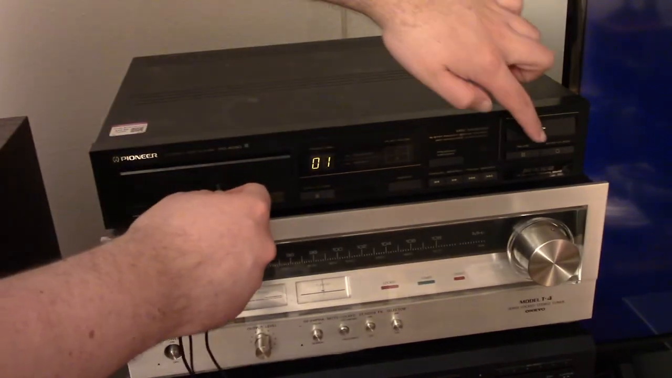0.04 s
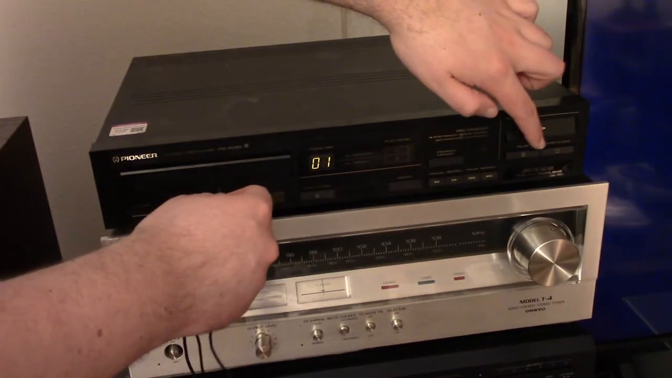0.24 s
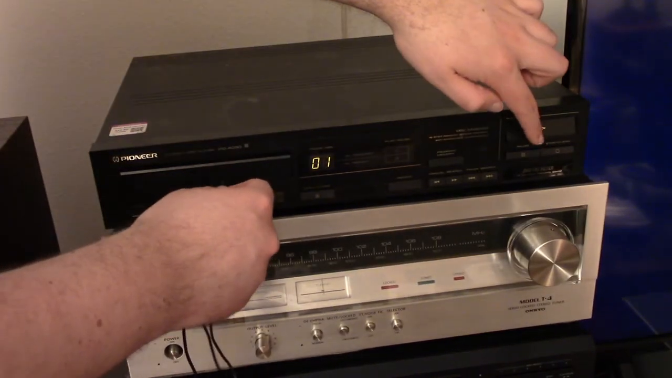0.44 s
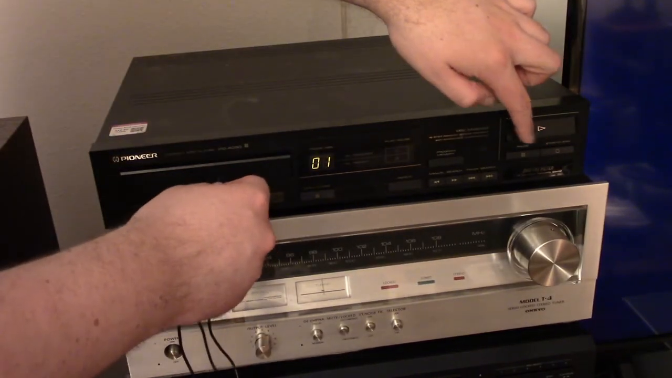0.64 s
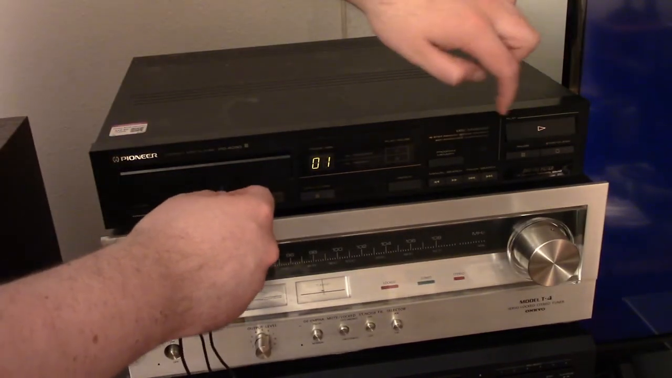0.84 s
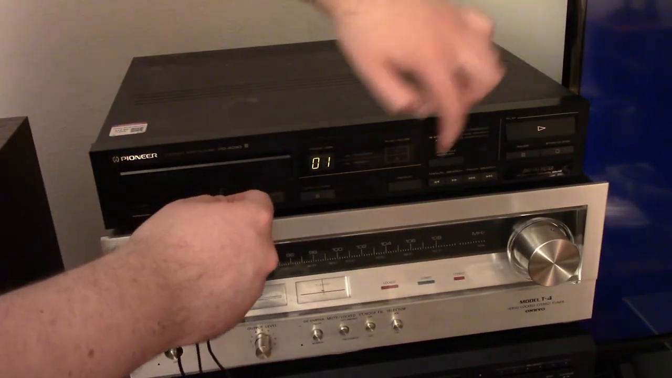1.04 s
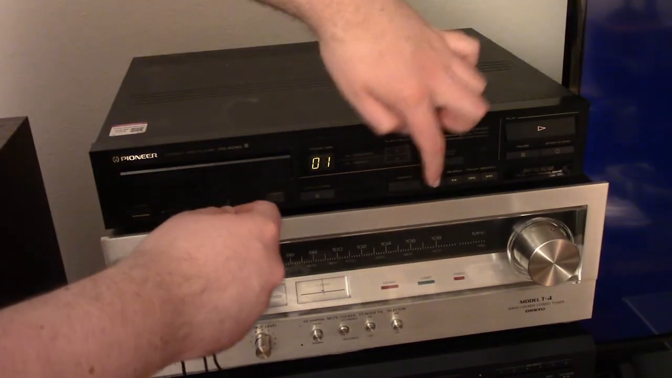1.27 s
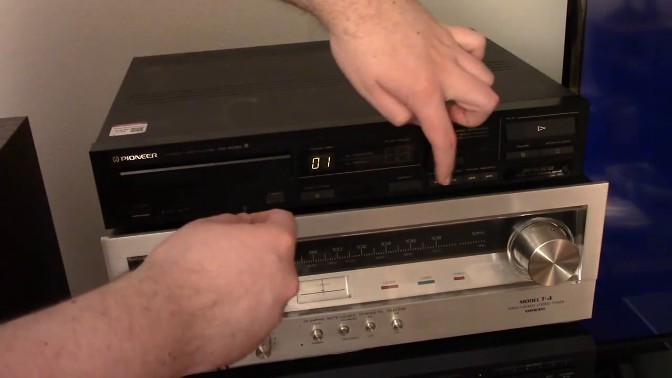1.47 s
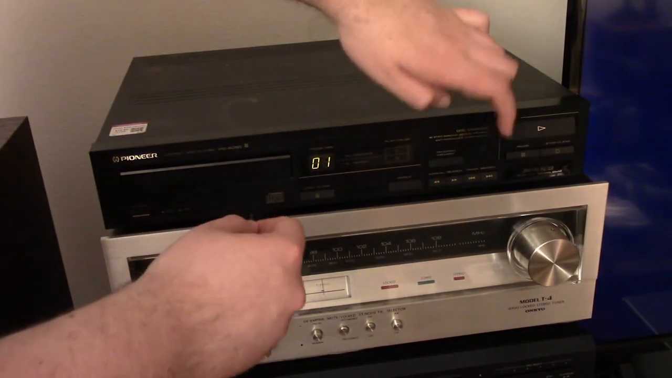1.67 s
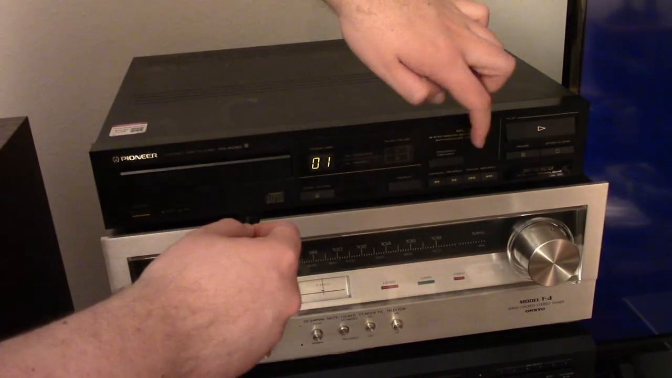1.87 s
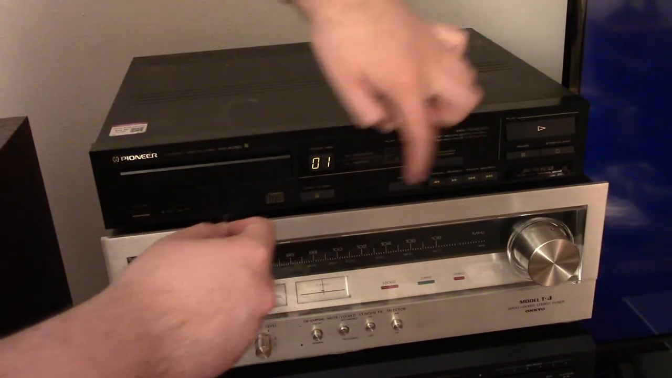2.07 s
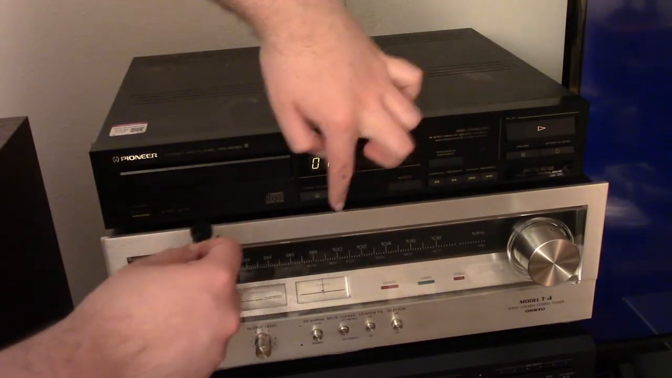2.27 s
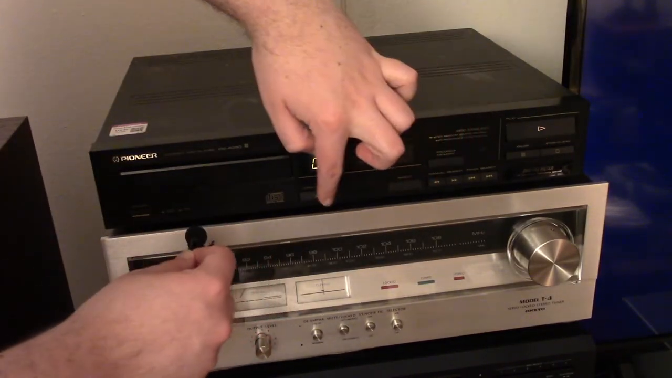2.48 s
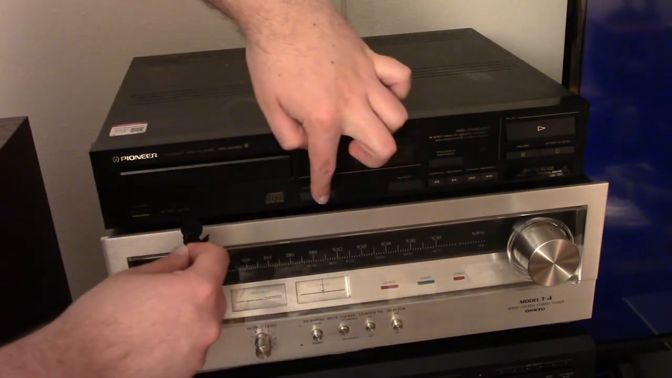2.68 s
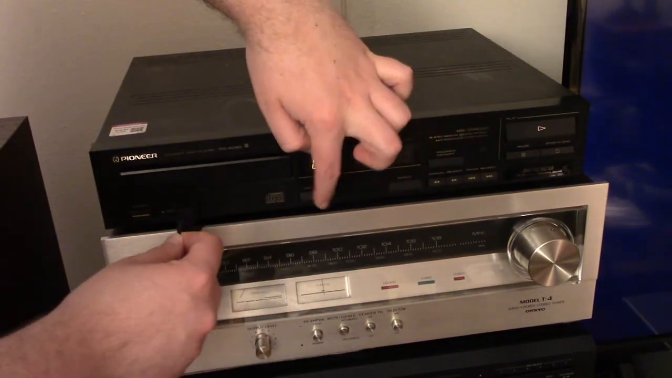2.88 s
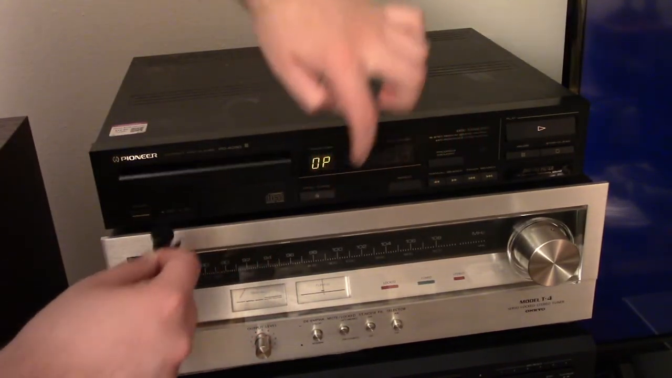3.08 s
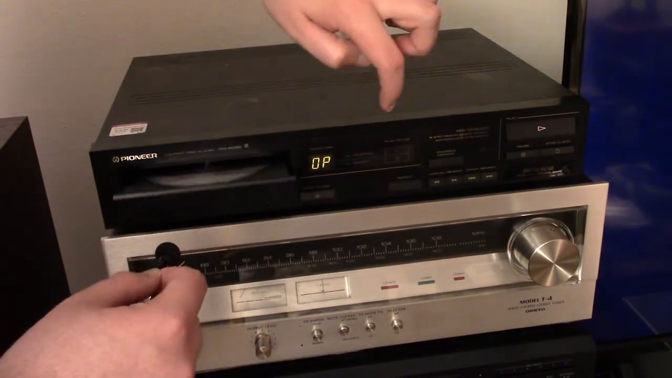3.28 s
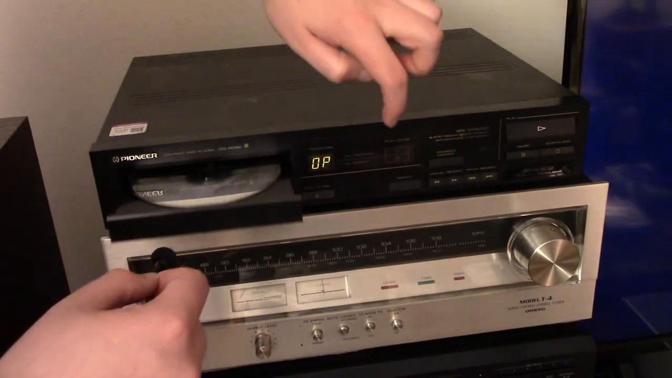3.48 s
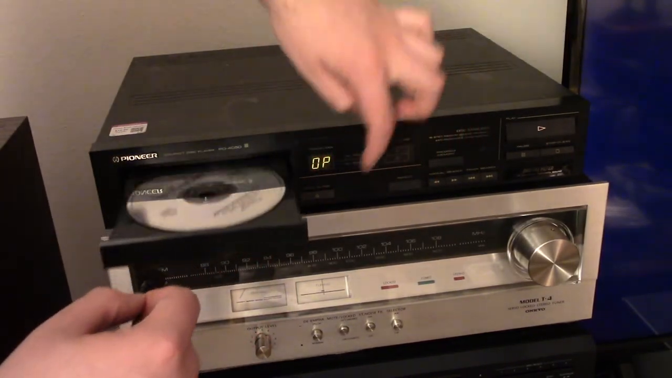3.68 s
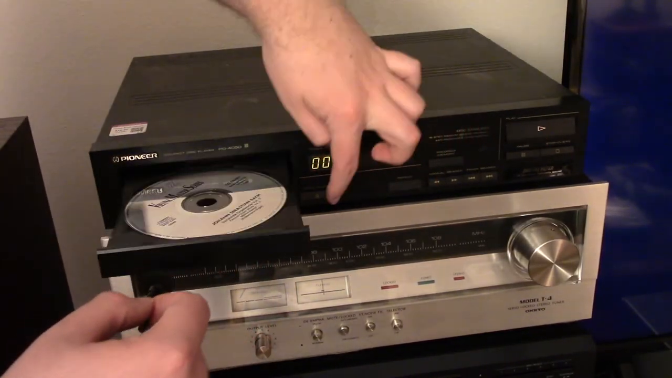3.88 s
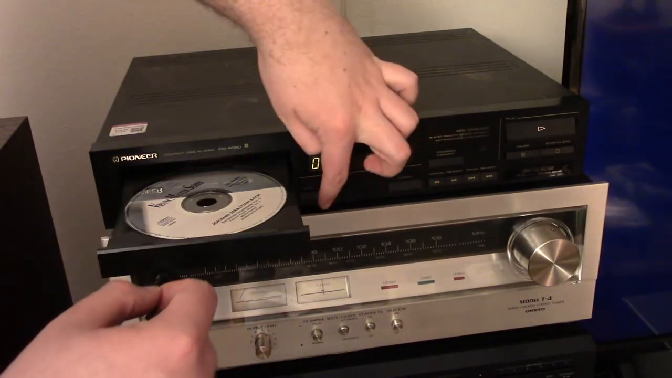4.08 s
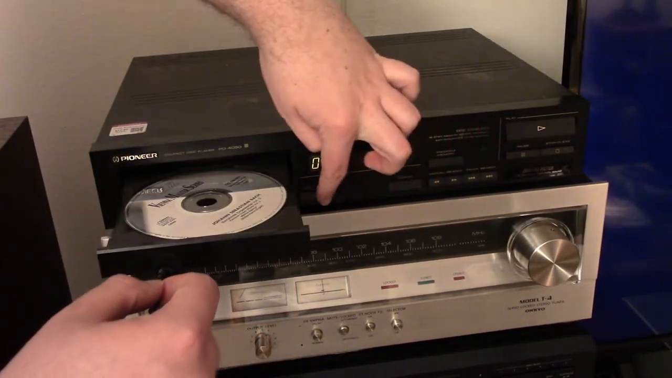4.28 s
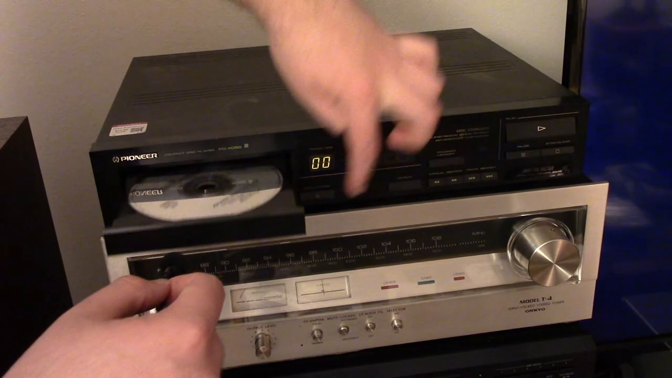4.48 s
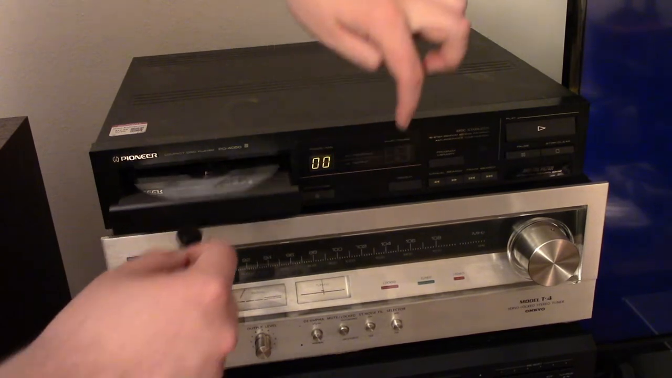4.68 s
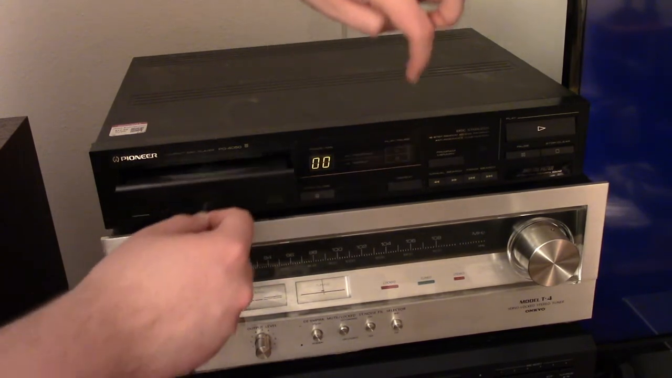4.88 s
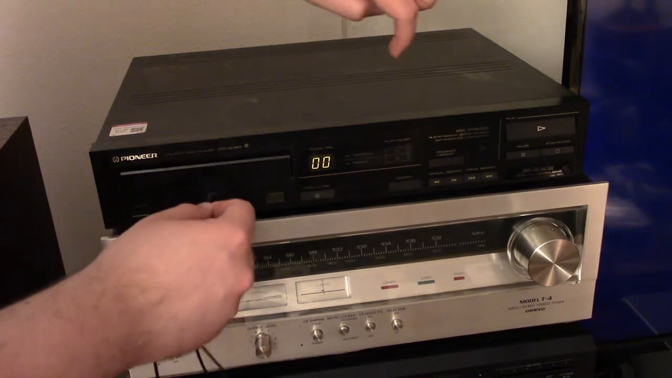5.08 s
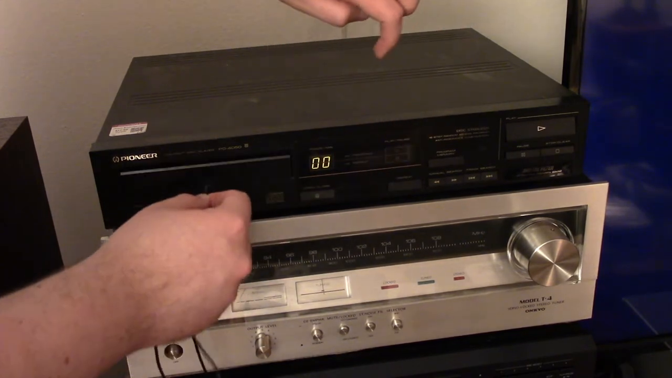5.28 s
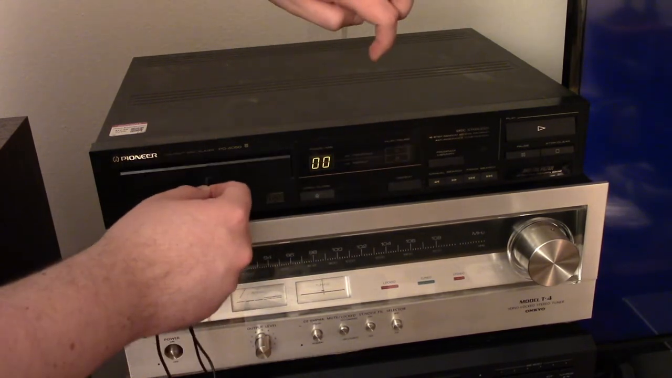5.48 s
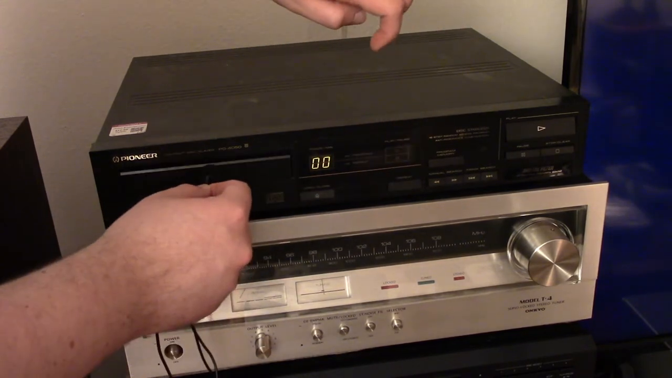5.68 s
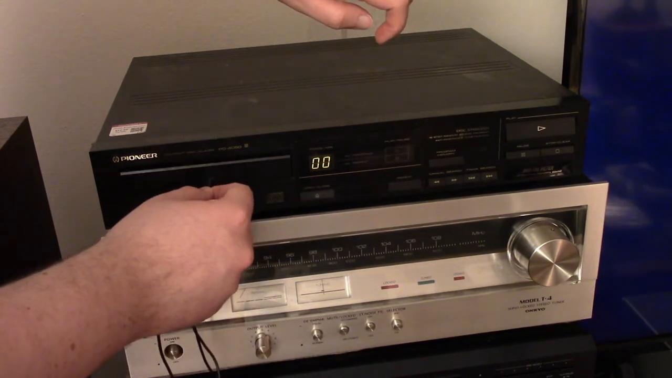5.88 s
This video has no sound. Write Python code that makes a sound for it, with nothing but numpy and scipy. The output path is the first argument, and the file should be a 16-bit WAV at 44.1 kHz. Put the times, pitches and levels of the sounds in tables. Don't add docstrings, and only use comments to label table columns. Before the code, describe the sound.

One close microphone in a small quiet room with soft rumble and hiss. Fingertips brush the panel while the disc whirrs to a stop. Light taps lead to clicks and knocks as the clamp releases, a raspy motorized tray opens and clacks at its end. It pauses, runs back in, slams loudest of all, rattles briefly, and the case and shelf ring away.

```python
import sys
import numpy as np
from scipy import signal
from scipy.fft import rfft, irfft, next_fast_len
from scipy.io import wavfile

SR = 44100
rng = np.random.default_rng(int(sys.argv[2]) if len(sys.argv) > 2 else 0)


def unload_audio(sound):
    columns = np.transpose(np.atleast_2d(sound))
    steps = np.round(np.clip(columns, -1, 1) * 32767)
    wavfile.write(sys.argv[1], SR, steps.astype(np.int16))


def gain_from_db(level_db):
    decades = np.asarray(level_db, float) / 20
    return 10 ** decades


N = 261733


def rms_one(x):
    return x / np.sqrt(np.mean(x ** 2) + 1e-20)


def in_time(rows, outside=None):
    s, *columns = np.transpose(rows)
    return [np.interp(np.arange(N) / SR, s, c, outside, outside) for c in columns]


def band(x, low_hz, high_hz):
    return signal.sosfilt(signal.butter(2, [low_hz, min(high_hz, .45 * SR)], "band", fs=SR, output="sos"), x)


def low_pass(x, hz):
    return signal.sosfilt(signal.butter(4, min(hz, .45 * SR), fs=SR, output="sos"), x)


def resonate(x, hz, width_hz):
    r = np.exp(-np.pi * width_hz / SR)
    edge = (1 - r * r) / 2
    return signal.lfilter([edge, 0, -edge], [1, -2 * r * np.cos(2 * np.pi * hz / SR), r * r], x)


def body(x, peaks):
    return sum((-1) ** k * gain_from_db(db) * resonate(x, hz, width) for k, (hz, width, db) in enumerate(peaks))


def wavering(x, peaks, swing_db, rate):
    out = np.zeros(N)
    for k, (hz, width, db) in enumerate(peaks):
        out += (-1) ** k * gain_from_db(db + swing_db * drift(rate)) * resonate(x, hz, width)
    return out


def gliding(x, peaks, ratio, swing_db, wander):
    out = np.zeros(N)
    for hz, width, db in peaks:
        turn = np.exp(2j * np.pi * np.cumsum(hz * (ratio + wander * drift(9))) / SR)
        r = np.exp(-np.pi * width / SR)
        ring = 2 * np.real(turn * signal.lfilter([1 - r], [1, -r], x / turn))
        out += gain_from_db(db + swing_db * drift(8.9)) * ring
    return out


def drift(rate):
    r = np.exp(-80 * np.pi * rate / SR)
    slow = signal.lfilter([1], [1, -2 * r, r * r], rng.standard_normal(N // 40 + 2002))[2000:]
    return np.interp(np.arange(N) / 40, np.arange(len(slow)), rms_one(slow))


def coloured(spectrum):
    hz, db = np.transpose(spectrum)
    size = next_fast_len(N)
    shape = gain_from_db(np.interp(np.log(np.fft.rfftfreq(size, 1 / SR) + 1), np.log(hz), db))
    return rms_one(irfft(rfft(rng.standard_normal(size)) * shape, size)[:N])


def grit(per_s, spread_db, smooth):
    sizes = gain_from_db(spread_db * np.minimum(rng.exponential(1, N), 4)) * rng.choice([-1, 1], N)
    impacts = sizes * (rng.random(N) < per_s / SR)
    return rms_one(impacts) + smooth * rng.standard_normal(N)


def rattle(noise, length_s):
    return noise * np.exp(-np.arange(len(noise)) / SR / max(length_s, .0003))


def add(out, s, sound, db):
    i = round(s * SR)
    out[i:i + len(sound)] += (gain_from_db(db) * sound / np.max(np.abs(sound)))[:N - i]


def strokes(rows, peaks):
    swell, t = np.zeros(N), np.arange(N) / SR
    for s, length, db in rows:
        swell += gain_from_db(db) * np.sin(np.pi * np.clip((t - s) / length, 0, 1)) ** 0.93
    rub = body(grit(per_s=4600, spread_db=13.5, smooth=2.6), peaks)
    return swell * gain_from_db(0.9 * drift(60)) * rms_one(rub)


# time_s, gear_load_db, sliding_db
DRIVE = [
    [(2.63, -73, -82), (2.69, -76, -77), (2.716, -40.5, -59), (2.886, -36, -58), (3.09, -47, -59),
     (3.22, -49, -63.5), (3.6, -46, -60), (3.72, -47, -64), (3.83, -76, -74)],
    [(4.2, -69, -80), (4.27, -44, -94), (4.372, -46, -61.5), (4.78, -42, -61), (4.93, -43.5, -57),
     (5.09, -43.5, -57.5), (5.128, -35.5, -61.5), (5.245, -34, -69), (5.34, -76, -100)],
]
# pitch_hz, width_hz, level_db
CASE = [(140, 11.6, -0.5), (187.4, 13, -3.5), (237, 13.5, 2), (282.3, 13.8, 1.5), (375, 67, -7.5),
        (556.6, 23, -4.5), (628, 47, -5.5), (815.6, 24.4, -4.5), (899, 63, -14.5), (1170, 89, -20.5)]
# pitch_hz, width_hz, level_db
TRAY = [(1250, 91, 10.1), (1670, 780, 0.17), (2450, 680, 7), (2950, 290, 2.1), (3900, 69, 4.1),
        (4800, 1100, 7.1)]
# pitch_hz, width_hz, level_db
RAIL = [(5930, 490, 0.5), (8280, 250, -3), (9200, 1200, -10), (12400, 4200, -20)]
# time_s, tray_pitch_ratio, rail_pitch_ratio
OVERHANG = [(3.0, 1.08, 0.96), (3.25, 0.95, 1.08), (3.45, 1.09, 0.99), (3.6, 0.88, 1.0), (4.45, 0.95, 1.03),
            (4.6, 0.98, 1.0), (4.75, 0.98, 1), (4.92, 1.02, 1.11), (5.1, 0.93, 1.4)]


def drive():
    load_db, slide_db = (np.maximum(*pair) for pair in zip(*(in_time(run, -120) for run in DRIVE)))
    rasp = gain_from_db(load_db - 20) + gain_from_db(slide_db + 7)
    shared_db = 1.2 * drift(25)
    friction = grit(per_s=990, spread_db=2.0, smooth=1.0)
    gears = grit(per_s=430, spread_db=1.5, smooth=0.46)
    wash = np.roll(friction, SR)
    tray_ratio, rail_ratio = in_time(OVERHANG)
    case = body(gears, CASE) + 0.042 * band(wash, 130, 820)
    tray = gliding(friction, TRAY, tray_ratio, swing_db=2.5, wander=0.014)
    tray = low_pass(tray + 0.77 * band(wash, 920, 7300), 3800)
    rail = gliding(friction, RAIL, rail_ratio, swing_db=2.0, wander=0.015)
    rail = band(rail + 0.89 * low_pass(wash, 7900), 3600, 14700)
    low = gain_from_db(load_db + shared_db + 2.0 * drift(20)) * rms_one(low_pass(case, 1950))
    mid = rasp * gain_from_db(shared_db + 1.1 * drift(35)) * rms_one(tray)
    high = gain_from_db(slide_db + shared_db + 1.1 * drift(35)) * rms_one(rail)
    return low + mid + high


# on_s, off_s, first_level_db, last_level_db
MOTOR_RUNS = [
    (2.807, 3.745, -46.5, -43.5),
    (4.425, 5.302, -52.5, -35),
]


def motor_on():
    t, edge_s, level = np.arange(N) / SR, 0.0061, np.zeros(N)
    for on, off, first_db, last_db in MOTOR_RUNS:
        fade = np.clip(np.minimum(t - on, off - t) / edge_s + .5, 0, 1)
        level += gain_from_db(np.interp(t, [on, off], [first_db, last_db])) * fade
    return level


# time_s, pitch_hz
MOTOR_HZ = [(2.6, 110.9), (3.2, 115.4), (3.8, 117.5), (4.2, 112.7), (4.7, 113.2), (5.4, 115.2)]
MOTOR_ORDERS = [1, 2, 3, 5, 7, 8.5]
# time_s, then level_db of each multiple
HUM_COLOUR = [(2.9, -9.5, 2.5, -2, -12, -23, -16), (3.2, -5.5, 2, 0, -11, -13, -16),
              (3.5, -8, 2.5, -1.5, -11, -15, -20), (3.7, -6, -8, -10, -5, -16, -26),
              (4.5, -0.5, 1.5, -13, -9, -9, -17), (4.85, 0, -2.5, 1, -6, -10, -17),
              (5.25, -13, -6.5, -4, -10, -17, -19)]


def motor_hum():
    turns = 2 * np.pi * np.cumsum(in_time(MOTOR_HZ)[0] * (1 + 0.014 * drift(9.03))) / SR
    tone = np.zeros(N)
    for k, db in zip(MOTOR_ORDERS, in_time(HUM_COLOUR)):
        tone += gain_from_db(db + 2.6 * drift(22)) * np.sin(k * turns)
    return motor_on() * rms_one(tone)


# start_s, peak_db, pitch_hz, rattle_s
KNOCKS = [(0.418, -47, 320, 0.0074), (2.245, -37, 244, 0.01), (2.27, -48, 237, 0.008),
          (2.349, -38.5, 260, 0.018), (2.632, -33, 259, 0.032), (2.709, -27.5, 567, 0.019),
          (2.718, -31, 380, 0.033), (2.978, -18.5, 216, 0.023), (2.994, -21, 200, 0.013),
          (3.014, -20, 266, 0.0056), (3.599, -25.5, 276, 0.016), (3.702, -22, 624, 0.011),
          (3.72, -22, 257, 0.02), (4.195, -45, 235, 0.015), (4.272, -29, 269, 0.017),
          (4.306, -32.5, 305, 0.0051), (4.387, -33.5, 292, 0.014), (4.401, -26, 237, 0.0046),
          (5.0057, -16, 233, 0.0075), (5.019, -16.5, 150, 0.014), (5.03, -10.5, 263.5, 0.0045),
          (5.023, -16.5, 587, 0.0053), (5.011, -14.5, 795, 0.013), (5.059, -23.5, 140, 0.0028),
          (5.122, -42, 250, 0.007), (5.264, -18, 607, 0.0066), (5.281, -28, 260, 0.013)]


def knocks():
    out = np.zeros(N)
    for (s, db, hz, length), noise in zip(KNOCKS, rng.standard_normal((len(KNOCKS), 9000))):
        push = band(rattle(noise, length), 54, 720)
        ring = 0.2 * body(push, CASE[:8]) + 2.76 * resonate(push, hz, 0.08 * hz)
        add(out, s, .5 * push + ring, db - 0.5)
    return out


# start_s, peak_db, top_db, pitch_hz
SNAPS = [(0.1024, -42.5, -42, 2520), (0.4219, -52.5, -1, 2490), (2.2363, -51, 9.5, 2800),
         (2.3384, -44, -15, 4000), (2.885, -20.5, -21, 4900), (2.9012, -31, -3, 5000),
         (2.9274, -20, -4.5, 2820), (3.5976, -22.5, -26, 2340), (3.6194, -31, -6, 2120),
         (3.6325, -49, -17, 2420), (3.6716, -35, -10, 2880), (3.703, -20.5, -14, 2930),
         (4.155, -50, 3, 4100), (4.4274, -26.5, -12, 2700), (4.9034, -32, -10, 2376),
         (4.9474, -42.5, 13, 2238), (4.9732, -45.5, 14, 2073), (5.0657, -36, -16, 2820),
         (5.0965, -25.5, -2, 2950), (5.1054, -32, 0, 2980), (5.2175, -27, -6, 5430), (5.436, -49, -1, 2310),
         (5.466, -39, -12, 2200), (5.9212, -43, -37, 3360)]
# start_s, peak_db, top_db, pitch_hz
CHATTERS = [(2.8482, -28, -2, 2200), (2.9445, -22.5, -14, 2520), (2.9579, -20, -18, 3900),
            (2.9837, -22.5, -15, 2210), (3.0124, -26.5, -6, 2590), (3.1304, -31.5, -8, 2450),
            (3.7095, -23, -20, 4400), (4.3214, -29.5, -9, 2700), (4.4015, -23, -6, 2670),
            (4.9816, -38, 6.5, 4460), (5.0064, -16, -5, 4500), (5.1571, -26, -9, 2100)]
# start_s, peak_db, top_db, pitch_hz
CLACKS = [(0.8107, -57, 7, 4000), (0.876, -61, 5, 4200), (2.3455, -44, -1, 1990),
          (2.3689, -46.5, -20, 1970), (2.7051, -23.5, 2, 5430), (2.7656, -20.5, -9, 4530),
          (2.8082, -27.5, 6, 2440), (2.8761, -23, -14, 3460), (3.149, -37, -19, 3630),
          (3.2311, -41, -16, 2800), (3.3055, -37, -20, 1960), (3.7184, -14.5, -4.5, 2470),
          (4.2633, -31, -5, 2360), (4.3042, -26.5, -2, 4640), (4.3874, -32, -31, 2790),
          (4.4206, -26.5, -3.5, 2320), (5.0826, -35, -8, 3610), (5.1181, -17, -8, 3620)]
# start_s, peak_db, top_db, pitch_hz
TAPS = [(1.9515, -49, -22, 2370), (2.6259, -24.5, -17, 2750), (2.649, -35.5, -2.5, 2050),
        (2.699, -33, -16, 3240), (2.8274, -28.5, -12, 1700), (3.6989, -27.5, -10, 2300),
        (4.1984, -28, -15, 2540), (4.2976, -47, 7, 2280), (4.6942, -46, -25, 2219),
        (5.2674, -32.5, -23, 1880), (5.3837, -56, 7, 2730), (5.7204, -51.5, -3, 2204)]
# start_s, peak_db, top_db, pitch_hz
SLAMS = [(2.7138, -20.5, -15, 2130), (4.2737, -28, -8, 2480), (5.0105, -13, -7, 4600),
         (5.0294, -21.5, -9, 4020), (5.1233, -21, -3.5, 3300), (5.1459, -25.5, -13, 4700),
         (5.2304, -27.5, -6, 2200)]
# events, case_share_db, rattle_s
CONTACTS = [(SNAPS, -8, 0.0058), (CHATTERS, -12, 0.017), (CLACKS, -1.2, 0.0066), (TAPS, 5.8, 0.0063),
            (SLAMS, 6.5, 0.015)]


def ticks():
    out = np.zeros(N)
    rows = [(*row, body_db, length) for table, body_db, length in CONTACTS for row in table]
    for (s, db, top_db, hz, body_db, length), noise in zip(rows, rng.standard_normal((len(rows), 3, 5000))):
        hit, bright, deep = (rattle(n, length * k) for n, k in zip(noise, (.8, .38, 1.4)))
        around = band(rattle(noise[2], length), max(0.56 * hz, 1100), 2.0 * hz)
        clack = around + .5 * body(hit, TRAY[1:]) + 4.2 * resonate(hit, hz, 310)
        hollow = band(deep, 620, 1196) + 0.82 * body(deep, CASE[5:] + TRAY[:2])
        add(out, s, low_pass(clack, 0.74 * hz + 2200), db - 5.5)
        add(out, s, band(bright, 2540, 8600), db + top_db - 2.0)
        add(out, s, hollow, db + body_db - 8.5)
    return out


# start_s, peak_db, pitch_hz, rattle_s
PINS = [(2.707, -25.5, 8750, 0.002), (2.7165, -30, 8800, .003), (2.7552, -42, 5200, .004),
        (2.7737, -28, 2900, 0.0036), (2.8077, -26.5, 7440, 0.0014), (2.8273, -39, 12700, 0.0036),
        (2.848, -36, 9530, .002), (2.883, -27.5, 9000, 0.0024), (2.886, -34, 12000, .002),
        (2.9005, -40, 12500, .002), (2.919, -31, 5500, 0.0044), (2.9268, -24, 6000, .0015),
        (2.95, -40, 9900, .005), (2.9600, -25, 6400, .002), (3.0121, -35.5, 7590, 0.0018),
        (3.0593, -55, 5850, .002), (3.0793, -52, 6170, .002), (3.0977, -49, 5020, .002),
        (3.482, -44, 6220, 0.0022), (3.5183, -44, 6170, 0.0022), (3.71, -23.5, 5900, .002),
        (4.4673, -55, 5000, .002), (4.5048, -47, 5760, 0.0023), (4.845, -45, 5130, 0.0024),
        (4.948, -35, 7810, .003), (5.0135, -17, 6440, 0.0048), (5.0135, -32, 14000, .003),
        (5.033, -33, 9870, .003), (5.0335, -39, 13500, .003), (5.0677, -38, 6300, .003),
        (5.1255, -35, 12500, .003), (5.1435, -39, 14000, .002), (5.153, -36, 9250, .005),
        (5.219, -39, 6116, .003), (5.2294, -33.5, 9200, .005), (5.246, -46, 12120, 0.0022),
        (5.269, -51, 5940, 0.0043), (0.4219, -53, 1500, 0.0026), (2.209, -62, 3000, .004),
        (5.7204, -54, 1610, 0.0029), (3.7179, -19.5, 5600, 0.0044), (3.7045, -24, 4360, .004),
        (4.3046, -30, 4800, 0.0034), (4.402, -30.5, 5000, .004), (4.428, -30, 6150, 0.0036),
        (2.35, -43, 940, 0.012), (3.091, -40, 3750, 0.0067), (0.1026, -51.5, 2590, 0.0023),
        (4.2745, -29, 1360, 0.0056), (3.307, -44, 1650, .005)]
SMALL_S = [2.7215, 2.79, 2.866, 2.911, 3.383, 3.419, 3.457, 3.469, 3.711, 3.713, 4.2035, 4.209, 4.224,
           4.2855, 4.292, 4.375, 4.3878, 4.438, 4.695, 5.0195, 5.0835, 5.0975, 5.106, 5.135, 5.151, 5.1655,
           5.171, 5.2185]
# peak_db, pitch_hz, rattle_s
SMALL_TOUCH = [(-27.5, 720, .008), (-34, 1430, .006), (-34, 1950, .005), (-36, 2400, .004),
               (-37.5, 440, .003), (-43, 3200, .008), (-43, 2700, .005), (-40, 2800, .002), (-29, 800, .006),
               (-30, 2000, .005), (-39, 2400, .003), (-41, 1900, .005), (-45, 1300, .012), (-34, 930, .008),
               (-36, 2300, .004), (-42, 2800, .005), (-31, 2650, .002), (-36.5, 4200, .003),
               (-45, 2600, .005), (-25, 3400, .005), (-35, 4000, .003), (-36, 4600, .002), (-35, 4700, .002),
               (-29, 1500, .01), (-30, 3300, .006), (-28.5, 4000, .004), (-34, 1800, 0.0036),
               (-33, 5600, .0025)]


def pins():
    out = np.zeros(N)
    rows = PINS + [(s, *touch) for s, touch in zip(SMALL_S, SMALL_TOUCH)]
    for (s, db, hz, length), noise in zip(rows, rng.standard_normal((len(rows), 2000))):
        touch = rattle(noise, length) + 2.0 * rattle(noise, 0.00021)
        add(out, s, resonate(touch, hz, 0.14 * hz) + 0.16 * band(touch, 0.81 * hz, 1.26 * hz), db)
    return out


# start_s, length_s, level_db
GRINDS = [(2.70, 0.1, -52), (2.86, 0.18, -48.5), (3.665, 0.032, -51), (3.697, 0.045, -38.5),
          (4.26, 0.1, -60), (4.40, 0.041, -47), (5.005, 0.03, -40.5), (5.06, 0.08, -49),
          (5.14, 0.14, -50.5)]
# pitch_hz, width_hz, level_db
CAM = [(3550, 1050, 1), (4900, 750, 2.5), (6400, 500, -0.5), (8800, 920, -5), (10000, 1200, -14)]


def cam_grind():
    return strokes(GRINDS, CAM)


# start_s, pitch_hz, level_db, fade_s (time to fall by 60 dB)
PING = [(0.8125, 4065, -62, 0.32), (.8125, 4100, -68, .15), (.8125, 4560, -67, .06),
        (.8125, 11710, -66, .05), (.803, 2500, -60, .03), (3.9335, 3955, -58, .12),
        (4.1565, 4210, -64, 0.15), (4.1565, 5510, -69, .08), (4.1565, 11710, -64, .07),
        (2.4655, 9010, -59, 0.055)]
# start_s, pitch_hz, level_db, fade_s
CLAMP = [(2.877, 3300, -34, 0.018), (2.886, 4900, -33, 0.049), (2.886, 3610, -26, 0.02),
         (2.901, 3600, -26, 0.017), (2.927, 3940, -26.5, 0.037), (3.147, 3650, -41, 0.044),
         (4.389, 2770, -30, 0.031), (4.401, 2720, -37, 0.05), (4.43, 2870, -36.5, 0.083),
         (5.097, 2880, -34, .1), (5.123, 4630, -26, 0.042), (5.118, 9830, -30.5, 0.014),
         (5.123, 1623, -28, 0.15), (3.719, 1260, -24.5, 0.021), (5.144, 4500, -30, 0.019),
         (2.901, 4900, -34, 0.051), (5.232, 2240, -37, 0.12)]
# start_s, pitch_hz, level_db, fade_s
SHELF = [(2.248, 253, -32, 0.051), (3.721, 181.7, -38.5, 0.66), (3.719, 170, -40, 0.56),
         (5.27, 110, -36, 0.48), (5.269, 371, -47.5, 0.6), (5.275, 188, -35.5, 0.65),
         (5.278, 270, -38.5, 0.54), (2.268, 220, -38.5, 0.14), (5.012, 82, -21.5, 0.11),
         (5.05, 139.4, -24.5, 0.2), (2.98, 99, -34.5, 0.27)]


def ringing_parts():
    out = np.zeros(N)
    t, shake, bend = np.arange(SR // 2) / SR, drift(25), drift(14.6)
    for rows, rough in ((PING, 0), (CLAMP, 0.25), (SHELF, 0.65)):
        for (s, hz, db, t60), i in zip(rows, rng.integers(0, N - len(t), len(rows))):
            phase = 2 * np.pi * hz * np.cumsum(1 + 0.035 * rough * bend[i:i + len(t)]) / SR
            fade = gain_from_db(-60 * t / t60 + 5.1 * rough * shake[i:i + len(t)])
            add(out, s, np.sin(phase) * fade, db)
    return out


# time_s, level_db
SPIN = [(0, -60), (.1, -68.5), (.28, -61.5), (.32, -63.5), (.4, -58.5), (.5, -59), (.56, -56), (.63, -60),
        (.68, -88)]
# pitch_hz, width_hz, level_db
WHIRR = [(257, 55, 6.5), (533, 42, 3), (810, 30, 10.5), (1070, 60, -7), (1220, 60, -0.5), (1440, 16, 7.5),
         (1680, 68, -4), (2050, 85, -16)]


def spin_down():
    whirr = wavering(rng.standard_normal(N), WHIRR, swing_db=4.0, rate=14.0)
    return gain_from_db(in_time(SPIN, -120)[0]) * rms_one(whirr)


# start_s, length_s, level_db
SLIDES = [
    (-.03, 0.096, -63.5),
    (.54, 0.11, -56.5),
]
# pitch_hz, width_hz, level_db
RUB = [(1510, 1100, 2.5), (4000, 99, 6), (5000, 160, -1), (7000, 560, -0.5), (7700, 160, 6),
       (9500, 940, -1), (13500, 550, -6)]
# start_s, length_s, level_db
TOUCHES = [(2.205, 0.056, -57.5), (2.335, 0.036, -52), (2.43, 0.083, -61.5), (3.92, 0.08, -60.5),
           (4.07, 0.064, -63)]
# pitch_hz, width_hz, level_db
PAD = [(1010, 350, 10.5), (3240, 490, 2.5), (4200, 360, 2.5), (6600, 800, -11), (8900, 350, -4)]


def fingertips():
    return strokes(SLIDES, RUB) + strokes(TOUCHES, PAD)


# start_s, peak_db, pitch_hz, cycles
BUMPS = [(0.176, -34.5, 241, 1), (0.176, -45, 660, 3.1), (0.219, -47, 330, 0.87), (0.262, -45, 303, 1.5),
         (0.631, -36.5, 73, 1.6), (0.746, -42.5, 88, 1.3), (1.453, -32.5, 85.5, 1.14),
         (1.695, -58, 203, 0.67), (1.8345, -35, 410, 0.75), (1.9516, -27.5, 607, 0.49),
         (5.007, -21, 60.4, 2.5), (4.258, -39, 33, 0.6), (4.233, -41, 45, 0.7), (5.21, -32, 50, 0.6)]


def bumps():
    out, t = np.zeros(N), np.arange(SR // 10) / SR
    for s, db, hz, cycles in BUMPS:
        add(out, s, -np.sin(2 * np.pi * hz * t) * np.exp(-(hz * t / cycles) ** 2), db)
    return out


def room(x):
    t60_s, wall_cut_hz, stir_s = 0.44, 1250, .0006
    out, dull = np.zeros(N), np.exp(-2 * np.pi * wall_cut_hz / SR)
    for k, lag in enumerate((rng.uniform(0.015, .045, 16) * SR).astype(int)):
        loop, gain, state = x.copy(), gain_from_db(-60 * lag / SR / t60_s), [0.]
        for i in range(lag, N, lag):
            back, state = signal.lfilter([gain * (1 - dull)], [1, -dull], loop[i - lag:i], zi=state)
            loop[i:i + lag] += back[:N - i]
        out += (loop - x) * (-1) ** k
    return np.interp(np.arange(N) + stir_s * SR * drift(6.06), np.arange(N), out)


SCATTER_S = [.0047, .0031, .0017]


def scatter(x):
    for lag in (np.array(SCATTER_S) * SR).astype(int):
        b = np.zeros(lag + 1)
        b[0], b[-1] = -.6, 1
        x = signal.lfilter(b, b[::-1], x)
    return x


# pitch_hz, level_db (per Hz)
AIR = [(8.8, -10), (15, -1), (39, -2.5), (97, -14), (190, -31.5), (213, -26.5), (442, -36.5), (610, -37),
       (685, -39), (1190, -40.5), (1420, -47), (1600, -46.5), (2620, -49.5), (11000, -58), (16000, -60.5)]
# time_s, level_db
SWAYS = [(0, -62), (.2, -55), (1.45, -69), (2.06, -49.5), (2.31, -47), (2.74, -46), (3.1, -40),
         (3.349, -44.5), (3.75, -53), (4.65, -47.5), (5.18, -47), (5.33, -47), (5.53, -48), (5.85, -54)]


def background():
    air, t, sway_s = coloured(AIR), np.arange(N) / SR, 0.077
    sway = gain_from_db(-47 - 0.3 * drift(3.3))
    for s, db in SWAYS:
        sway += gain_from_db(db) * np.exp(-((t - s) / sway_s) ** 2)
    lumps = sway * gain_from_db(1.25 * drift(24)) * rms_one(band(air, 15.3, 142.0))
    return gain_from_db(-41.5) * band(air, 79.0, 24000) * gain_from_db(0.29 * drift(13.0)) + lumps


# pitch_hz, level_db (per Hz)
SPREAD = [(59, -33), (100, 7), (140, -2), (197, 0.5), (1610, -1.5), (6700, -3), (12700, -6.5), (16000, -10)]


def circuit_noise():
    return gain_from_db(-71) * coloured(SPREAD) * np.array([[1], [-1]])


def scene():
    player = drive() + motor_hum() + ticks() + knocks() + ringing_parts() + spin_down() + fingertips()
    echoes = gain_from_db(-18) * scatter(room(player))
    close = pins() + cam_grind() + bumps()
    return player + echoes + close + background() + circuit_noise()


def band_limit(x):
    return signal.sosfilt(signal.butter(12, 16640, fs=SR, output="sos"), x)


def record(dry):
    rounded = 0.54 * np.tanh(dry / 0.54)
    mix = signal.sosfilt(signal.cheby2(12, 60, 16500, fs=SR, output="sos"), rounded)
    return band_limit(mix)


dry = scene()
out = record(dry)
unload_audio(out)
```